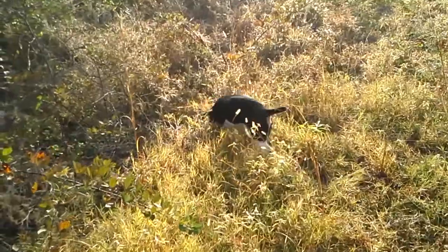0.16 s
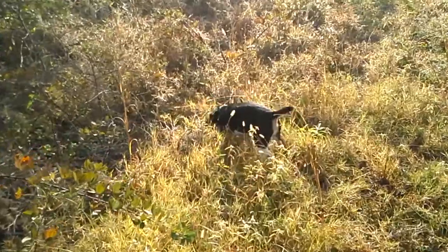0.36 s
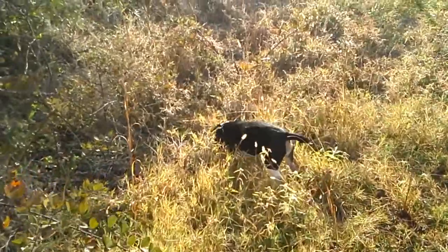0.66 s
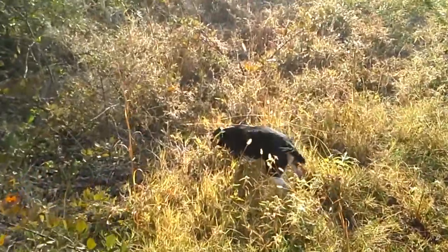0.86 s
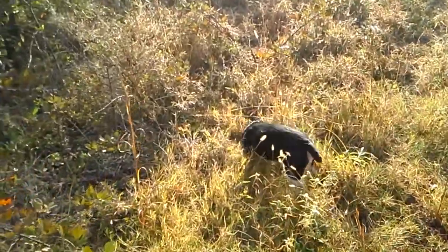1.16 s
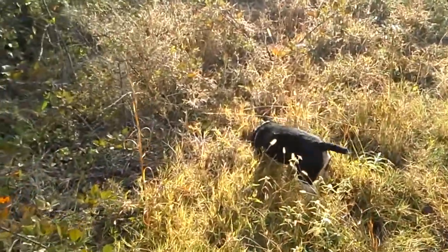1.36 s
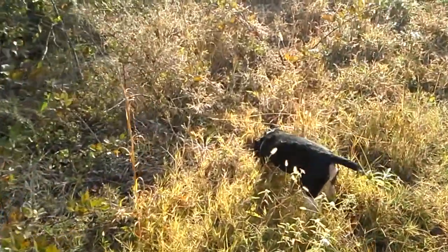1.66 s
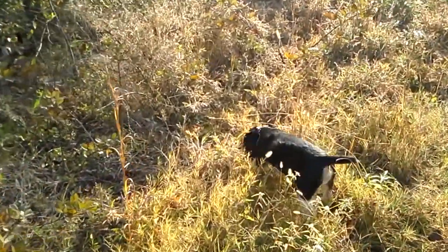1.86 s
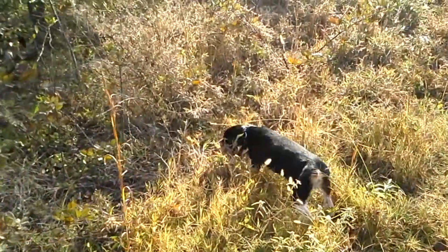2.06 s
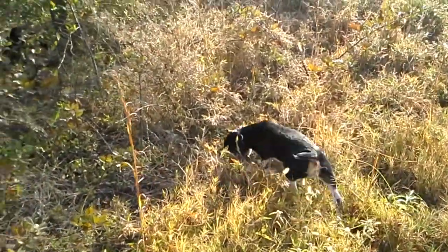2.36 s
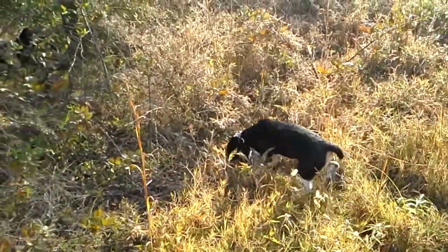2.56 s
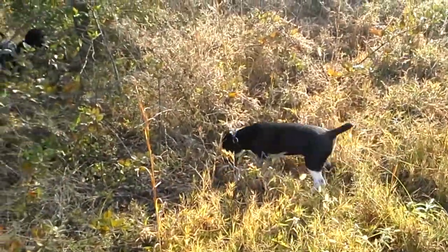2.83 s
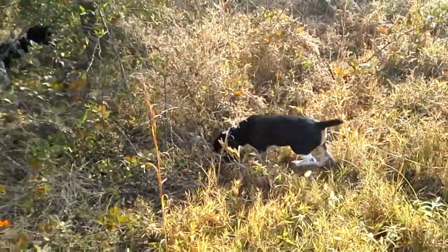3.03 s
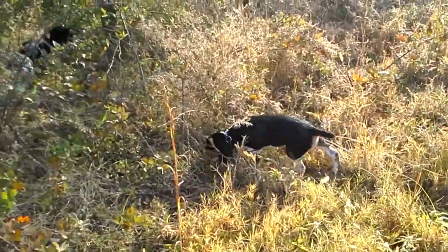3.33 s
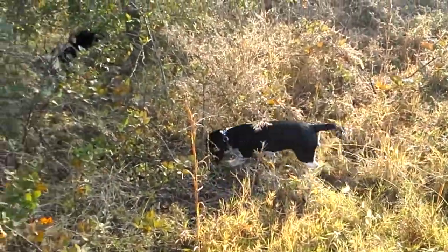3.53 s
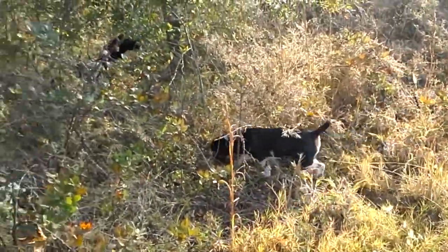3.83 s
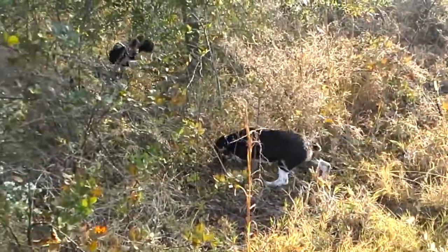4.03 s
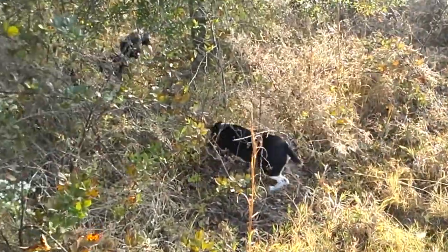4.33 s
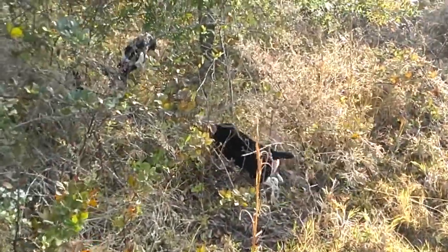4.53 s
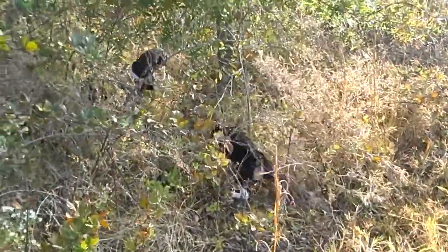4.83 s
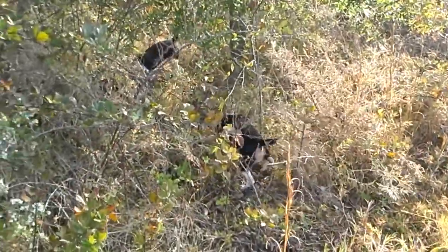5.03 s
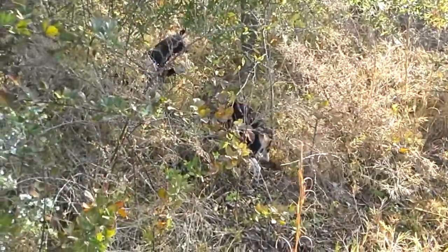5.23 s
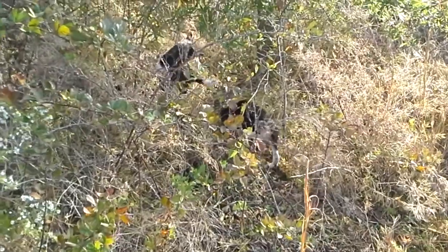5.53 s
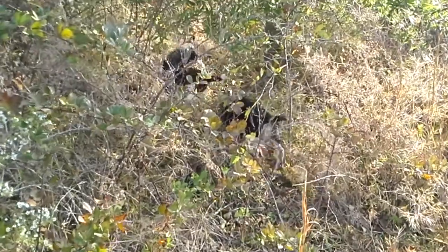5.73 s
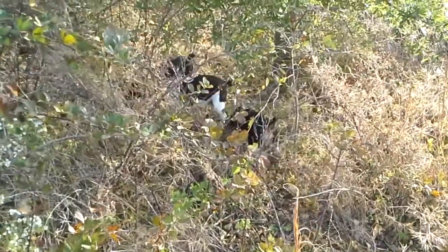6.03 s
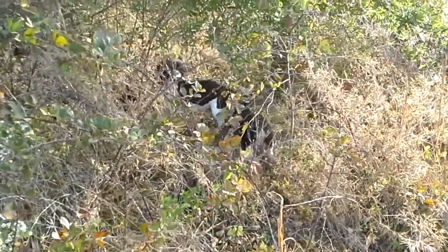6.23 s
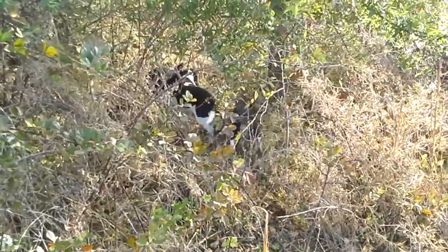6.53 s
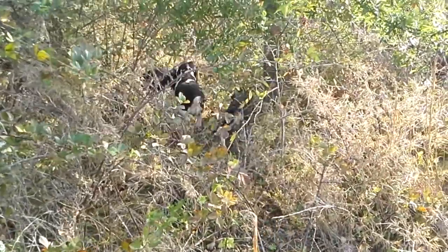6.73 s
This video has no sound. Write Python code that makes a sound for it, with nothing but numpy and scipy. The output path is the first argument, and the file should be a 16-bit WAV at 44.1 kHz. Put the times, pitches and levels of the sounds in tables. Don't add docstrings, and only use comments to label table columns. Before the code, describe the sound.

Outdoors in sunlit scrub, hounds bark and bay in raspy voices, many calls breaking from a brief clear note into hoarseness, interspersed with squeaky yelps. The calls are loud, close and nearly dry, with a faint scattered echo from trees. Beneath them are insect hiss, crackling leaves, rustling weeds, a small bell and early low wind gusts. Calling stops near six and a half seconds, leaving brush noise and snapping stems.

```python
import sys
import numpy as np
from scipy import signal
from scipy.fft import rfft, irfft, next_fast_len
from scipy.io import wavfile
from scipy.ndimage import uniform_filter1d, map_coordinates

SR = 44100
rng = np.random.default_rng(int(sys.argv[2]) if len(sys.argv) > 2 else 0)


def store_pcm(level_fs):
    pcm = np.round(np.clip(level_fs, -1, 1) * 32767).astype(np.int16)
    wavfile.write(sys.argv[1], SR, np.atleast_2d(pcm).T)


def gain_from_db(level_db):
    decades = np.asarray(level_db, float) / 20
    return 10 ** decades


N = 303835
CLOCK = np.arange(N) / SR
ATTACK_S, RELEASE_S, RELEASE_DB = 0.022, 0.024, -22.5


def unit(x):
    return x / np.sqrt(np.mean(x ** 2) + 1e-20)


def along(points, hz):
    f, v = np.transpose(points)
    return np.interp(np.log(hz + 1), np.log(f + 1), v)


def curves(rows, t=CLOCK):
    s, *cols = np.transpose(rows)
    return [np.interp(t, s, c) for c in cols]


def wobble(rate_hz, size=N):
    knots = rng.standard_normal(int(max(size, SR) * rate_hz / SR) + 4)
    return map_coordinates(knots, [np.arange(size) * rate_hz / SR])


def filtered(x, response):
    m = next_fast_len(len(x) + 4096)
    return irfft(rfft(x, m) * response(np.fft.rfftfreq(m, 1 / SR)), m)[:len(x)]


def resonance_power(mode, f):
    center_hz, width_hz, db = mode
    damping = 1j * f * width_hz
    return np.abs(gain_from_db(db) * damping / (center_hz * center_hz - f * f + damping + 1e-9)) ** 2


def span(rows, fade_s):
    cut = slice(round(rows[0][0] * SR), round(rows[-1][0] * SR))
    t = CLOCK[cut]
    return cut, t, np.clip(np.minimum(t - t[0], t[-1] - t) / max(fade_s, .001), 0, 1)


def smooth_patches(shape, bins, frames):
    return uniform_filter1d(uniform_filter1d(rng.standard_normal(shape), bins, axis=0), frames, axis=1)


def noise(spectrum, patchy_db):
    z = signal.stft(rng.standard_normal(N), nperseg=512)[2]
    patches = gain_from_db(patchy_db * unit(smooth_patches(z.shape, 6, 10)))
    white = signal.istft(z * patches, nperseg=512)[1][:N]
    points = [(10, -120)] + list(spectrum) + [(17000, -120)]
    return unit(filtered(white, lambda hz: gain_from_db(along(points, hz))))


def effort(points, peak_db, chest_db, mouth_hz, gape):
    chest_holds, rasp_db, rasp_holds = 0.58, -17, 0.2
    return [(s, db, chest_db - chest_holds * (db - peak_db), mouth_hz * (1 + gape * max(db - peak_db, 0)),
             rasp_db - rasp_holds * (db + 4)) for s, db in points]


def bay(s, length_s, punch_db, hold_db, mouth_hz):
    onset_db, settle_s, second_wind_s, second_wind_db, tires_db = -4.5, 0.12, 0.072, 0.5, -1
    end_s = s + length_s
    points = [(s, punch_db + onset_db),
              (s + ATTACK_S, punch_db),
              (s + ATTACK_S + settle_s, hold_db),
              (end_s - second_wind_s, hold_db + second_wind_db),
              (end_s - RELEASE_S, hold_db + tires_db),
              (end_s, hold_db + RELEASE_DB)]
    return effort(points, hold_db, -10.5, mouth_hz, gape=.011)


def bark(s, length_s, peak_db, chest_db, mouth_hz):
    onset_db, shoulder_db, crest_share, tires_db = -24, -3.5, 0.38, -10
    end_s = s + length_s
    points = [(s, peak_db + onset_db),
              (s + ATTACK_S, peak_db + shoulder_db),
              (s + crest_share * length_s, peak_db),
              (end_s - RELEASE_S, peak_db + tires_db),
              (end_s, peak_db + tires_db + RELEASE_DB)]
    return effort(points, peak_db, chest_db, mouth_hz, gape=0)


def hoarse():
    # start_s, length_s, punch_db, hold_db, mouth_hz
    bays = [
        (0.819, 0.36, -3, -12.5, 1748),
        (2.701, 0.417, -4, -12.5, 1717),
        (3.294, 0.39, 1, -11.5, 1652),
        (5.409, 0.33, -6, -10.5, 1902),
    ]
    # start_s, length_s, peak_db, chest_db, mouth_hz
    barks = [
        (0.234, 0.12, -8, -28.5, 1876),
        (.49, 0.15, -2.5, -13, 1807),
        (1.509, 0.22, -7.5, -7, 1875),
        (1.938, 0.096, -6.5, -16.5, 1800),
        (2.031, 0.26, -6.5, -11.5, 2166),
        (2.199, 0.26, -8.5, -17, 1756),
        (2.391, 0.14, -15, -16.5, 1770),
        (3.894, 0.12, -3, -14, 1694),
        (4.913, .16, -2.5, -11, 1846),
        (5.927, 0.055, -11, -32, 1820),
    ]
    # center_hz, width_hz, level_db
    rasp_modes = [(5200, 410, 12), (6050, 390, 13.5), (6730, 116, 14.5), (7810, 270, 12.5), (9200, 2000, 2)]
    chest, pharynx = (625, 125, 0), (1310, 240, -4)  # Hz, width Hz, dB
    stft = dict(fs=SR, nperseg=1024, noverlap=896)
    out = np.zeros(N)
    for rows in [bark(*row) for row in barks] + [bay(*row) for row in bays]:
        cut, t, gate = span(rows, fade_s=0.0042)
        db, chest_db, _, rasp_db = curves(rows, t)
        cycle = np.cumsum(436 * (1 + .08 * wobble(200, size=len(t)))) / SR % 1
        puffs = (0.25 + np.exp(-cycle * 4)) * rng.standard_normal(len(t))
        f, frames, z = signal.stft(puffs, **stft)
        streaks = smooth_patches((len(z), SR // 128), 2, 34)[:, :len(frames)]
        z = z * gain_from_db(3.8 * unit(streaks))

        def through(gain):
            return unit(signal.istft(z * gain, **stft)[1][:len(t)])

        f = f[:, None]
        mouth_hz = curves(rows, frames + t[0])[2]
        lips_hz = np.minimum(1.35 * mouth_hz, 2650)
        band = 1 / (1 + (f / (1.1 * lips_hz)) ** 14) / (1 + (480 / (f + 1)) ** 10)
        modes = [pharynx, (mouth_hz, 290, 0), (lips_hz, 170, -6)]
        tract = sum(resonance_power(mode, f) for mode in modes)
        voice = through(band * (tract + 0.035))
        voice += gain_from_db(chest_db) * through(band * resonance_power(chest, f))
        power = np.abs(uniform_filter1d(voice ** 2, size=441)) / np.mean(voice ** 2)
        voice = voice / (power + .1) ** .3
        lift = 1 + 0.13 * (frames - .15)
        rasp_floor = .03 * (f > 2900) / (1 + (f / 11000) ** 4)
        rasp = through(sum(resonance_power(mode, f / lift) for mode in rasp_modes) + rasp_floor)
        out[cut] += gate * gain_from_db(db - 1.5) * (voice + gain_from_db(rasp_db - 2.0) * rasp)
    return out


def partials(rows, t, levels_db, jitter, flutter_db):
    hz = curves(rows, t)[0]
    phase = 2 * np.pi * np.cumsum(hz * (1 + jitter * wobble(160.2, size=len(t)))) / SR
    out = np.zeros(len(t))
    for k, db in enumerate(levels_db, 1):
        size = gain_from_db(db + flutter_db * k ** 0.53 * wobble(68.5, size=len(t))) * (k * hz < SR / 3)
        out += np.sqrt(2) * size * np.cos(k * phase - k / 2)
    return out


def chest_notes(calls, jitter, flutter_db, even_db):
    # freq_hz, level_db
    throat = [(470, -42), (800, -5), (1290, 9.5), (1810, 5.5), (2280, -4.5), (2940, -16), (3590, -21.5),
              (4390, -24), (5190, -25), (7930, -13), (9290, -28), (10000, -17), (13000, -76), (22000, -120)]
    out = np.zeros(N)
    for rows in calls:
        cut, t, gate = span(rows, fade_s=0.0053)
        hz, first_db, third_db = curves(rows, t)
        base_db = third_db - along(throat, 3 * hz)
        upper = [base_db + along(throat, k * hz) + even_db * (k % 2 == 0) for k in range(2, 21)]
        out[cut] += gate * partials(rows, t, [first_db] + upper, jitter, flutter_db)
    return out


def lead_in(s, swell_s, hz, first_db, third_db):
    swell_db, swell_climb = -24.5, 0.0165
    break_s, break_db, break_climb = 0.0245, -13.5, 0.048
    return [(s - swell_s, hz * (1 - swell_climb), first_db + swell_db, third_db + swell_db),
            (s, hz, first_db, third_db),
            (s + break_s, hz * (1 + break_climb), first_db + break_db, third_db + break_db / 2)]


def droop(s, fall_s, hz, first_db, third_db):
    swell_s, climb, fade_db, sag_per_s = .036, 0.0597, -17.5, 1.7
    return [(s - swell_s, hz * (1 - climb), first_db + fade_db, third_db + fade_db / 2),
            (s, hz, first_db, third_db),
            (s + fall_s, hz * (1 - sag_per_s * fall_s), first_db + fade_db, third_db)]


def clear_notes():
    # crest_s, swell_s, pitch_hz, first_db, third_db (partials)
    lead_ins = [
        (.508, 0.057, 596, -22, -30),
        (.828, 0.042, 600.3, -3.5, -8.5),
        (1.53, .03, 586, -10, -19.5),
        (2.03, 0.01, 644, -14.5, -15.5),
        (2.71, .017, 564.7, -10, -8.5),
        (3.291, .017, 525.5, -11.5, -7.5),
        (3.89, .04, 514, -13, -4),
        (5.112, 0.036, 778, -30, -28),
        (5.406, 0.018, 555.6, -10, -13),
        (5.936, 0.027, 741, -9.5, -18.5),
    ]
    # crest_s, fall_s, pitch_hz, first_db, third_db (partials)
    droops = [
        (.236, 0.096, 822.4, -6.5, -31),
        (1.955, 0.064, 805, -14.5, -32),
        (4.186, 0.019, 317, -39.5, -55.5),
        (6.79, 0.061, 533.4, -29.5, -35.5),
    ]
    calls = [lead_in(*row) for row in lead_ins] + [droop(*row) for row in droops]
    return chest_notes(calls, jitter=.005, flutter_db=1.2, even_db=-9)


def tone(s, end_s, first_hz, last_hz, db):
    scoop, scoop_s, fade_db = 0.0407, 0.0509, -2
    low_db = db - 19.5
    return [(s, first_hz * (1 - scoop), low_db + fade_db, db + fade_db / 2),
            (s + scoop_s, first_hz, low_db, db),
            (end_s - scoop_s, last_hz, low_db, db),
            (end_s, last_hz * (1 - scoop / 2), low_db + 2 * fade_db, db + fade_db)]


def held_tones():
    # start_s, end_s, first_hz, last_hz, third_db (partial)
    tones = [
        (.84, 1.171, 468.7, 438, -26),
        (2.04, 2.389, 444, 439, -19),
        (2.365, 2.498, 433, 431, -14),
        (2.74, 3.099, 435.5, 435.4, -19.5),
        (3.336, 3.666, 431.5, 432, -19.5),
        (5.452, 5.706, 435, 431, -27),
    ]
    return chest_notes([tone(*row) for row in tones], jitter=.008, flutter_db=1.4, even_db=0)


def doubled(points, since_s, half_db, octave_db, later_octave_db):
    single_db = -49
    return [(s, hz, db + half_db, db, db + later_octave_db) if s > since_s
            else (s, hz, db + single_db, db, db + octave_db) for s, hz, db in points]


def arch(s, hz, sag_hz, drop_hz, db):
    climb_s, climb_hz_per_s, voiced_s, hold_s, drop_s = 0.064, 2900, 0.032, 0.033, .028
    unvoiced_db, voiced_db, held_db, dropped_db = -44, -5.5, -4, -16.5
    half_db, octave_db, doubled_octave_db = -24.5, -5, -10
    sag_s, low_hz = s + hold_s, hz - sag_hz
    points = [(s - climb_s, hz - climb_hz_per_s * climb_s, db + unvoiced_db),
              (s - climb_s + voiced_s, hz - climb_hz_per_s * (climb_s - voiced_s), db + voiced_db),
              (s, hz, db),
              (sag_s, low_hz, db + held_db),
              (sag_s + drop_s / 2, low_hz - drop_hz / 2, db + 2 * held_db),
              (sag_s + drop_s, low_hz - drop_hz, db + dropped_db)]
    return doubled(points, s + hold_s / 2, half_db, octave_db, octave_db + doubled_octave_db)


def yelps():
    # top_s, top_hz, hold_sag_hz, final_drop_hz, level_db
    arches = [
        (4.318, 715, 49, 128, -11),
        (4.654, 739, 18.5, 346, -9.5),
        (6.523, 747, -10.5, 313, -9),
    ]
    # time_s, pitch_hz, level_db
    broken = [
        [(.215, 580, -19), (.25, 684, -27.5), (.3, 711.6, -31), (.325, 722, -23), (.34, 530, -52)],
        [(1.16, 643, -20.5), (1.18, 731, -12.5), (1.205, 765, -8), (1.225, 687, -8), (1.27, 675, -21),
         (1.285, 550, -19.5), (1.3, 396, -51)],
        [(1.628, 716, -10.5), (1.645, 668, -11.5), (1.68, 688, -20), (1.705, 566, -28)],
        [(1.888, 459, -60), (1.9, 482, -8), (1.915, 468.5, -3), (1.925, 456.4, -4), (1.955, 448.4, -15),
         (1.965, 440, -28)],
        [(5.112, 568, -42), (5.122, 594.5, -3), (5.147, 579, -.5), (5.154, 678, -7), (5.2, 635, -13),
         (5.23, 664, -15), (5.262, 522, -21.5)],
        [(5.938, 421, -13), (5.952, 454, -13), (5.972, 454, -18.5), (5.99, 485, -55)],
    ]
    # from_s, half_db, octave_before_db, octave_after_db
    doubling = [
        (.24, 0.5, -2, -18),
        (1.22, -3.5, -7.5, -25),
        (1.61, -1, -9, -27),
        (1.922, -6.5, -6.5, 1),
        (5.115, -26, 4, -12.5),
        (5.945, -15, -10, -5),
    ]
    # partial_number, level_db
    squeal = [(4, 0), (6, -18), (10, -29), (16, -44)]
    calls = [arch(*row) for row in arches] + [doubled(y, *d) for y, d in zip(broken, doubling)]
    out, push = np.zeros(N), np.zeros(N)
    for rows in calls:
        cut, t, gate = span(rows, fade_s=0.0025)
        _, half_db, main_db, octave_db = curves(rows, t)
        levels = [half_db, main_db]
        for k in range(3, 17):
            levels.append(half_db + 4.0 - 7 * (k - 3) if k % 2 else octave_db + along(squeal, k))
        out[cut] += gate * partials(rows, t, levels, jitter=.007, flutter_db=1.1)
        push[cut] += gate * gain_from_db(main_db)
    linger = gain_from_db(-60 * CLOCK[:SR // 3] / 0.21)
    breath_spectrum = [(500, -9.0), (900, 11.5), (1900, 3), (3500, 0.5), (9000, -4.0), (15000, -30)]  # Hz, dB
    air = noise(breath_spectrum, patchy_db=9.0)
    return out + gain_from_db(-10.5) * signal.fftconvolve(push, linger / linger.sum())[:N] * air


def trees(x):
    # freq_hz, t60_s
    decay = [(300, 0.23), (2000, 0.22), (9000, 0.45)]
    hz, t, z = signal.stft(rng.standard_normal(SR // 2), SR, nperseg=256)
    tail = signal.istft(z * gain_from_db(-60 * t / along(decay, hz)[:, None]), SR, nperseg=256)[1]
    return signal.fftconvolve(np.pad(x, (500, 0)), tail / np.linalg.norm(tail))[:N]


def bell():
    # freq_hz, t60_s
    modes = [(2110, 0.2), (4790, 0.14), (5515, 0.12), (7515, 0.11), (8540, 0.2), (8955, 0.073),
             (13790, .07)]
    # time_s, hum_db, wall_db, rim_db, top_db
    strikes = [
        (.7, -47, -53, -56, -62),
        (1.78, -44, -62, -57, -60),
        (3.688, -33, -25.5, -28.5, -55),
        (3.79, -37, -42, -49, -58),
        (5.722, -26, -26, -14.5, -22),
        (5.76, -24, -47, -27, -52),
    ]
    out, t = np.zeros(N + SR), CLOCK[:SR // 2]
    for s, hum_db, wall_db, rim_db, top_db in strikes:
        levels = [hum_db, wall_db, rim_db, wall_db, rim_db, wall_db, top_db]
        ring = np.zeros(len(t))
        for db, (hz, t60_s) in zip(levels, modes):
            ring += gain_from_db(db + rng.normal() - 60 * t / t60_s) * np.sin(2 * np.pi * hz * t)
        out[round(s * SR):][:len(t)] += ring * (1 - np.exp(-t / 0.00033))
    return out[:N]


def crackle():
    # time_s, peak_db
    twigs = [
        (0.1594, -19),
        (5.3846, -11.5),
        (6.251, -12),
        (6.3814, -15),
        (6.4254, -15.5),
        (6.8138, -17),
    ]
    snaps = np.zeros(N)
    snaps[rng.integers(0, N, size=260)] = gain_from_db(-41 + 7.1 * rng.standard_normal(260).clip(max=2))
    for s, db in twigs:
        snaps[round(s * SR)] = gain_from_db(db - 3.5)
    decay = gain_from_db(-60 * CLOCK[:800] / .012)
    bursts = signal.fftconvolve(snaps, decay)[:N] * rng.standard_normal(N)
    return filtered(bursts, lambda f: 1 / (1 + (3000 / (f + 1)) ** 4) / (1 + (f / 9000) ** 2))


def weeds():
    # time_s, level_db
    rustle = [(0, -42.5), (.34, -37), (.77, -42), (1.9, -44.5), (2.11, -33.5), (2.51, -41.5), (3.26, -42),
              (3.6, -36.5), (4.1, -42), (4.72, -41.5), (5.66, -38), (6.05, -35.5), (6.14, -42.5),
              (6.34, -45.5), (6.42, -41.5), (6.7, -41), (6.89, -39.5)]
    # freq_hz, level_db_per_hz
    field = [(150, -53), (250, -19.5), (306, -6), (353, -7.5), (460, -10), (497, -6.5), (619, -2),
             (1400, -7), (1880, -5.5), (2910, -11), (3740, -9.5), (7680, -4), (10500, -19), (13600, -55),
             (22000, -120)]
    # freq_hz, level_db_per_hz
    fine_spectrum = [(8000, -13), (10500, -11.5), (13000, -7.5), (15800, -3.5)]
    (rustle_db,) = curves(rustle)
    fine_db = -49 + 0.91 * (rustle_db - rustle_db.mean())
    stir = wobble(30)
    coarse = gain_from_db(rustle_db + 0.8 + 1.4 * stir + 1.8 * wobble(7)) * noise(field, patchy_db=1.3)
    fine = gain_from_db(fine_db + 2.2 * stir + 0.75 * wobble(6)) * noise(fine_spectrum, patchy_db=2.5)
    return coarse + fine


def wind():
    # time_s, level_db
    strength = [(0, -39.5), (.34, -39), (.77, -45), (1.06, -32.5), (1.44, -21), (1.69, -25.5),
                (1.94, -32.5), (2.11, -73), (2.51, -40), (2.97, -52.5), (3.72, -52.5), (5.66, -48.5),
                (6.26, -54.5), (6.89, -49)]
    # time_s, peak_db
    bumps = [
        (0.736, -4),
        (1.77, -0.5),
        (3.699, -23),
        (4.739, -19),
        (5.822, -17),
        (6.017, -14),
    ]
    # freq_hz, level_db_per_hz
    gusts = [(15, -42), (25, -29), (75, -3.5), (194, -1), (291, -4.5), (644, -23.5), (700, -39), (910, -53),
             (1540, -120)]
    (wind_db,) = curves(strength)
    puffs = sum(gain_from_db(db - 22.0) * np.exp(-((CLOCK - s - .015) / 0.018) ** 2) for s, db in bumps)
    lumps = unit(gain_from_db(4 * wobble(45) + 0.8 * wobble(12)))
    return (gain_from_db(wind_db) * lumps + puffs) * noise(gusts, patchy_db=4.0)


def scene():
    pack = hoarse() + clear_notes() + held_tones() + yelps()
    echo = gain_from_db(-24) * trees(pack)
    return (pack + echo + bell() + crackle() + weeds() + wind())[None]


def band_limit(x):
    return signal.sosfilt(signal.butter(12, 16990, fs=SR, output="sos"), x)


def record(dry):
    top_hz, low_cut_hz, clip_level = 15830, 50, .715
    x = dry[0] + 0.002 * dry[0] ** 2
    clipped = x / (1 + np.abs(x / clip_level) ** 12) ** (1 / 12)
    mix = filtered(clipped, lambda hz: (hz < top_hz) * hz / np.hypot(hz, low_cut_hz))[None]
    return band_limit(mix)


dry = scene()
out = record(dry)
store_pcm(out)
```